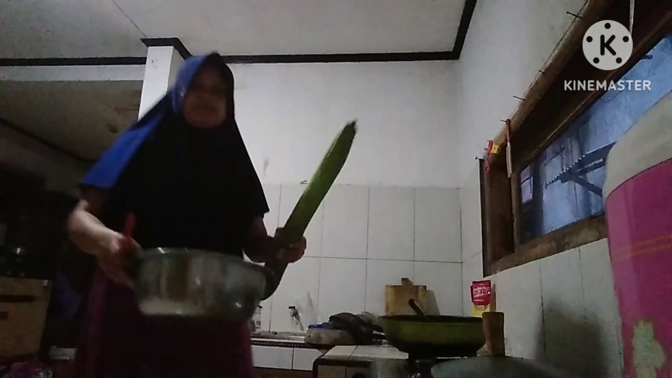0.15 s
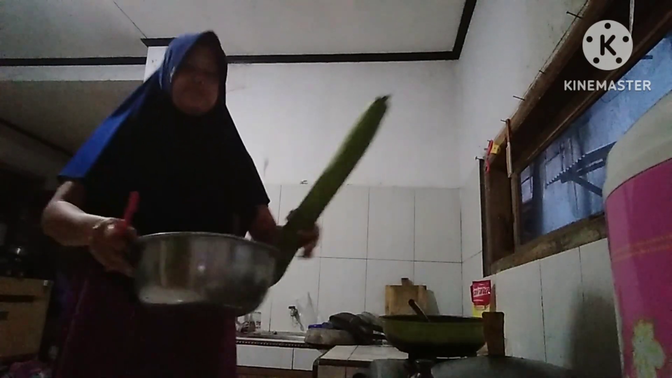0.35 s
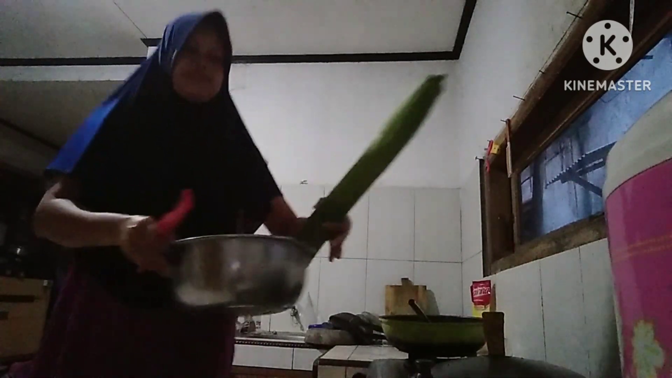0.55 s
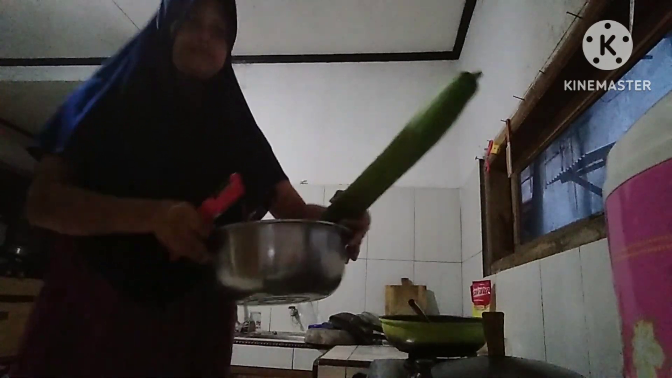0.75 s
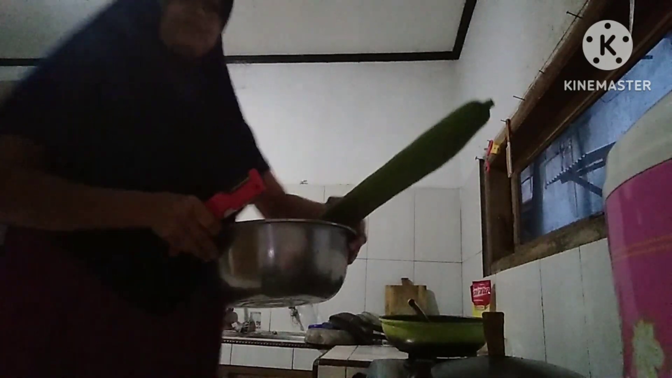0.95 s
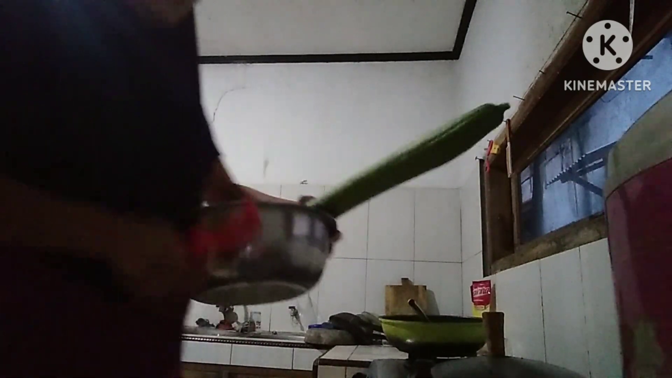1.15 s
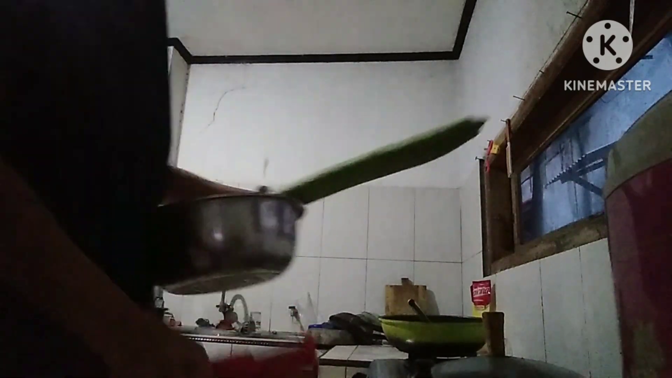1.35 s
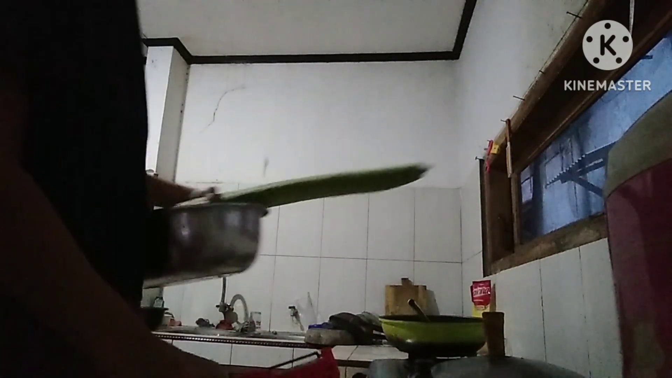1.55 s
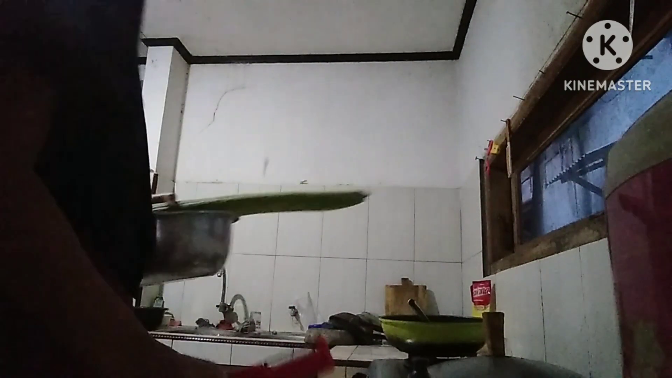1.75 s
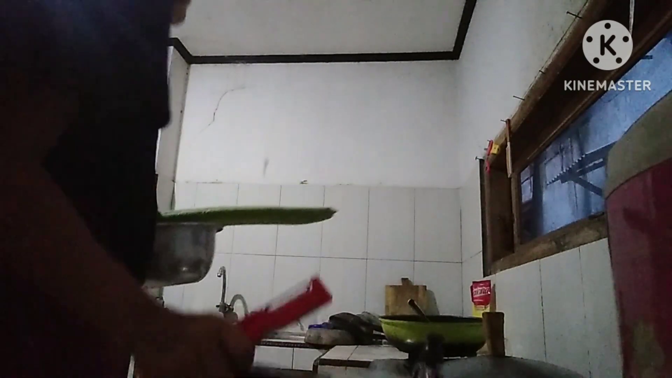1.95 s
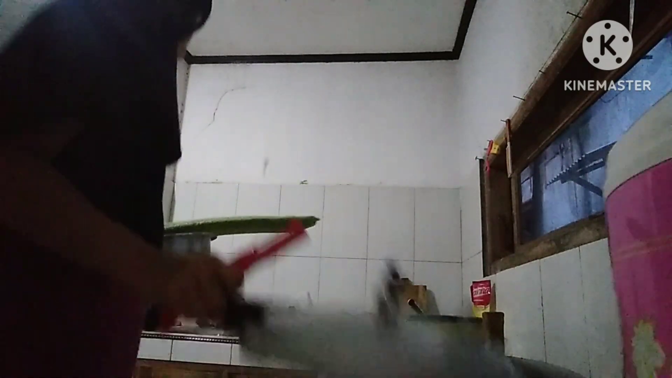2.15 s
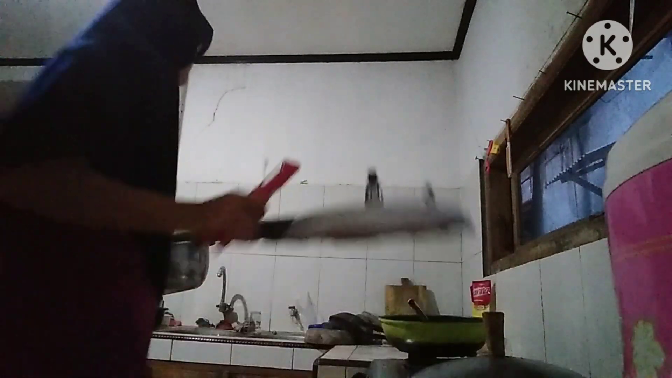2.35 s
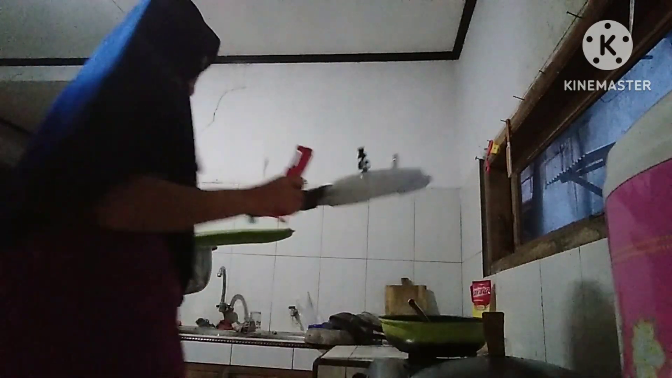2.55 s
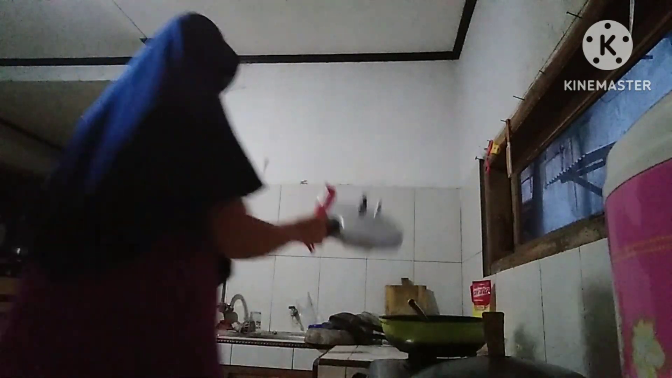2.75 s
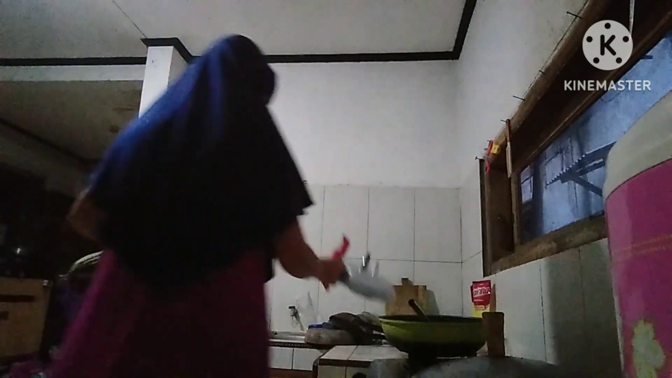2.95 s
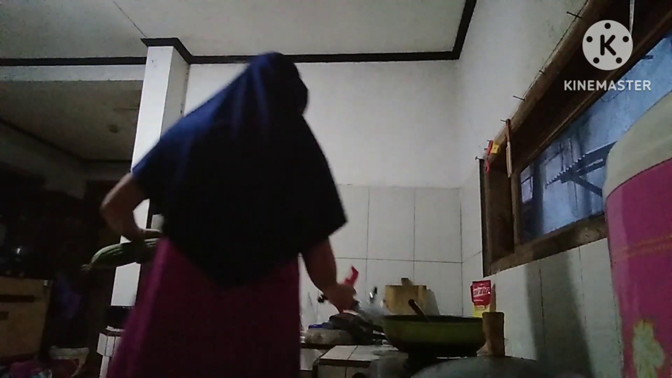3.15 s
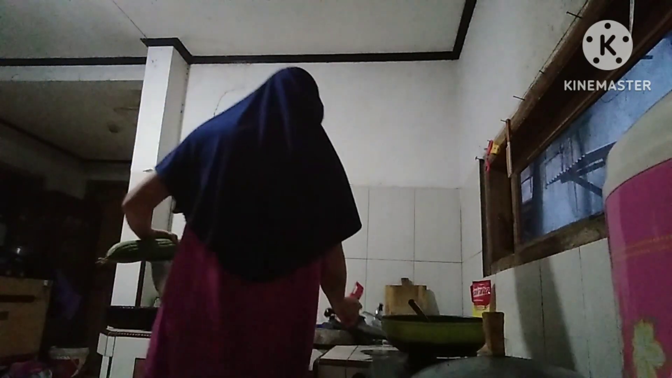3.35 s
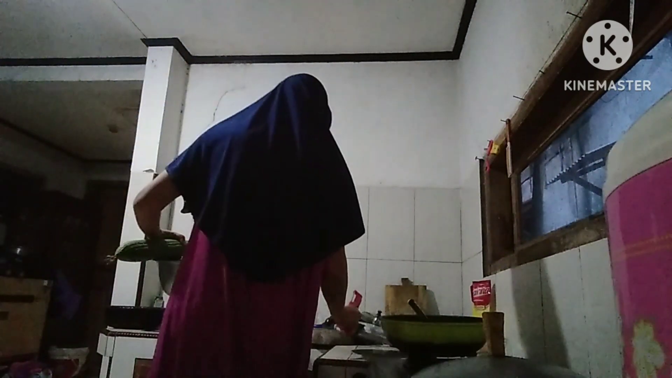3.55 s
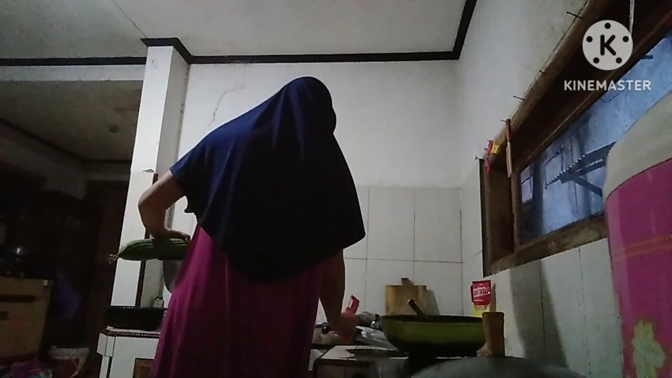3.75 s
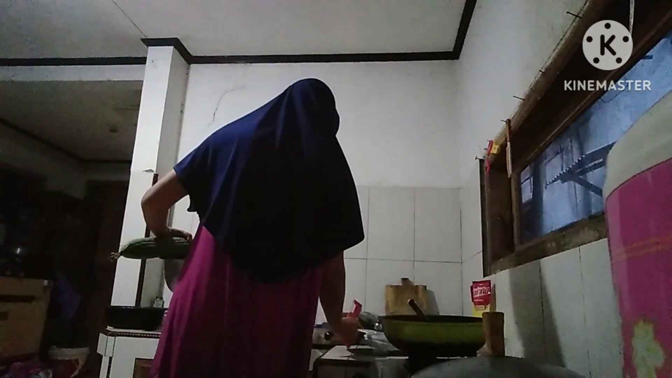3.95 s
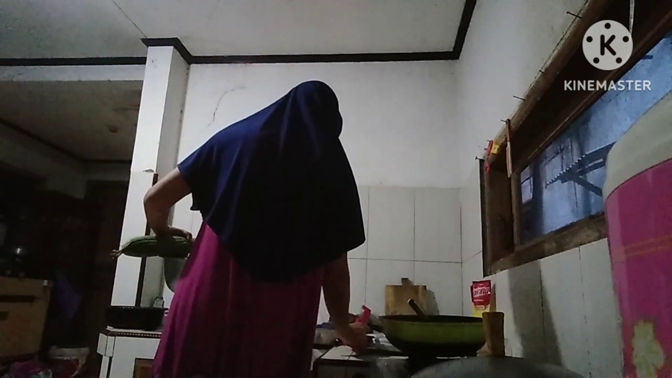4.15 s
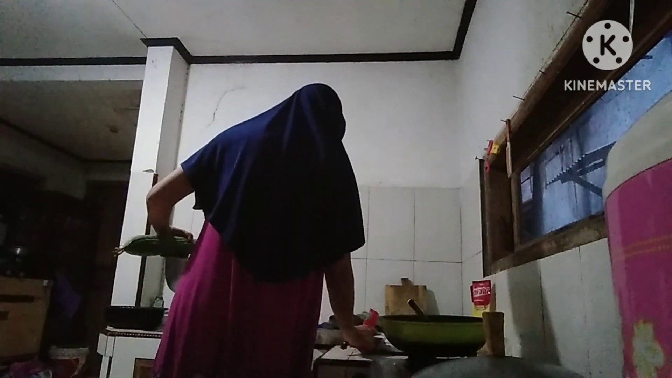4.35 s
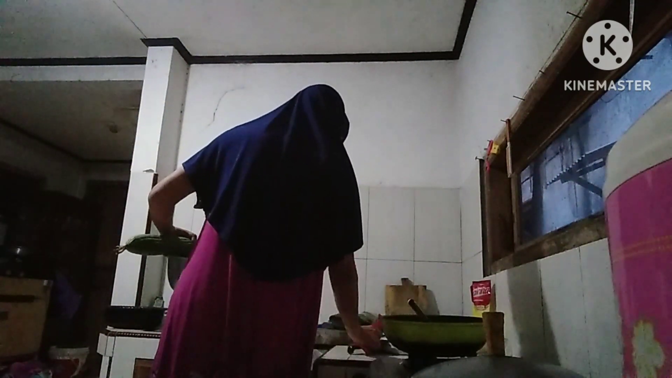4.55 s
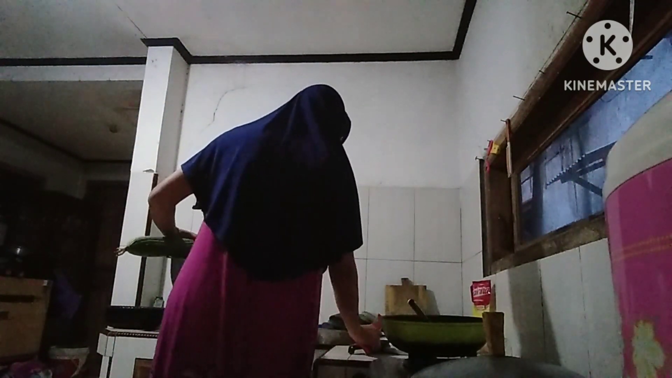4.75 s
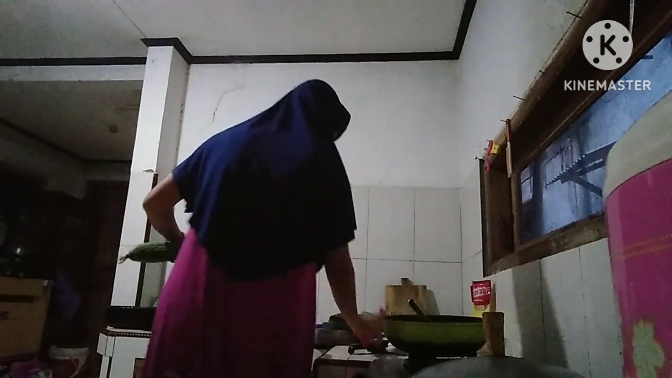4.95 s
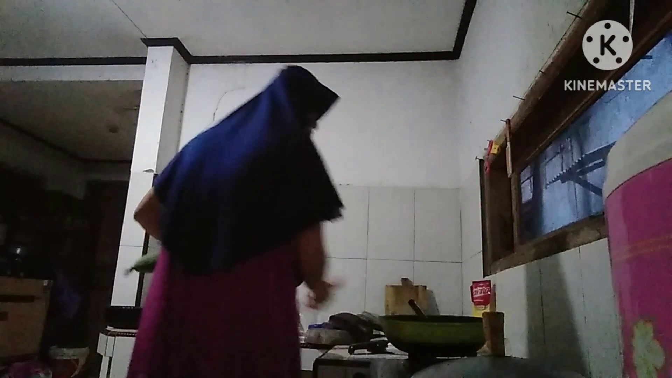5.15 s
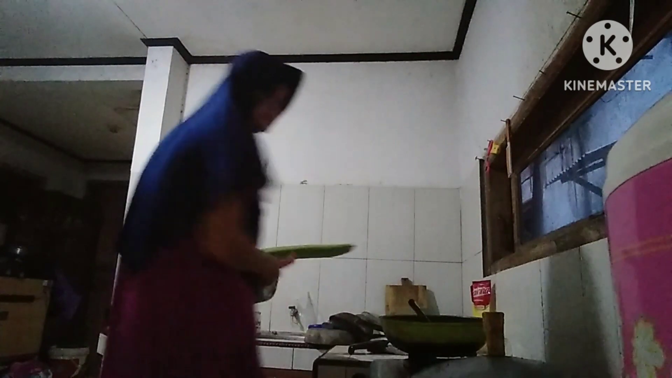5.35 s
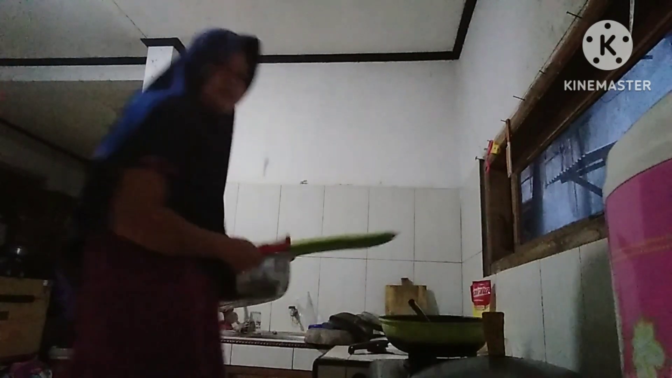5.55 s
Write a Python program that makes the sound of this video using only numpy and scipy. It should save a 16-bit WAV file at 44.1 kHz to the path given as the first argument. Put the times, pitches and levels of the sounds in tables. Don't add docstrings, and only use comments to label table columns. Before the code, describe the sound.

A cook shuffles with rustling cloth, a steel bowl knocks sharply, and farther off a lid bangs down, slides and clatters against pots.

```python
import sys
import numpy as np
from scipy import signal
from scipy.fft import rfft, irfft, next_fast_len
from scipy.io import wavfile
from scipy.ndimage import uniform_filter1d

SR = 44100
rng = np.random.default_rng(int(sys.argv[2]) if len(sys.argv) > 2 else 0)


def store_wav(level_fs):
    pcm = np.round(np.clip(np.atleast_2d(level_fs), -1, 1) * 32767)
    wavfile.write(sys.argv[1], SR, pcm.T.astype(np.int16))


def makeup_ratio(level_db):
    decades = np.asarray(level_db, float) / 20
    return 10 ** decades


N = 246519

# [peak t/s, swell time/s, cloth level/dB, hiss level re cloth/dB]
SCUFFS = [(0.0, .01, -69.5, -3), (0.1, 0.13, -69, -1), (0.4, 0.0067, -70, 13.5), (0.45, 0.026, -67, -1),
          (0.6, 0.15, -65, -3.5), (0.76, 0.2, -71, 7.5), (0.9, 0.09, -71, 3), (1.04, 0.063, -69, 3),
          (1.2, 0.085, -81, 4), (1.36, 0.45, -72.5, 0), (1.5, 0.13, -69.5, 0.5), (1.72, 0.16, -77, 4.5),
          (1.8, 0.022, -70, 2.5), (1.88, .06, -71.5, 3), (2.27, 0.068, -68, 2), (2.4, 0.041, -73.5, -1),
          (2.83, 0.048, -78.5, 7), (2.96, 0.23, -69, -3.5), (3.2, 0.083, -82, 3.5), (3.45, 0.13, -77, 1.5),
          (3.53, 0.13, -75.5, 1.5), (5.099, .1, -85, 3.5), (5.26, 0.092, -72.5, 1.5),
          (5.391, 0.0076, -72.5, 5), (5.489, 0.082, -63.5, 2.5), (5.58, 0.04, -83, -5.5)]
# [f/Hz, level per Hz/dB]
CLOTH_SPECTRUM = [(200, -3), (500, 0.5), (1200, 0), (2500, -1), (4000, -7), (5500, -16)]
HISS_SPECTRUM = [(3000, -18), (5000, 1.5), (6500, 11.5), (9000, -12), (15500, 1)]

# [t/s,
# level/dB, f/Hz, t60/s]
NUDGES = [(0.02, -69, 880, 1.2), (0.78, -55, 213, .8), (1.975, -47, 664, .6), (1.8, -68, 4350, .15),
          (1.795, -71, 5500, .3), (1.82, -70, 3850, .15), (1.875, -67, 5450, .2), (1.16, -66, 1150, .4),
          (0.888, -58, 1600, .15), (1.788, -57, 395, 0.27), (1.834, -51, 396, 0.22), (1.84, -60, 470, .15),
          (2.72, -57, 645, .2), (2.73, -61, 590, .15), (2.94, -57, 655, .3), (2.955, -58, 615, .25),
          (3.295, -70, 1740, .45), (.398, -57, 2500, .06), (.396, -54, 6500, .04), (.442, -52, 3100, .04),
          (.442, -51, 3600, .03), (.42, -58, 4800, .06), (.438, -58, 5000, .05), (.562, -52, 3400, .05),
          (.575, -62, 1300, .1), (.592, -62, 1750, .06), (1.9, -60, 250, .25), (.04, -69, 1000, .2),
          (1.025, -65, 3150, .05), (1.025, -65, 4400, .1),
          (3.8, -56, 228, .8), (4.0, -58, 482, .5), (4.16, -57, 226, .5), (4.72, -60, 228, .5),
           (3.905, -37, 2001, .2), (3.96, -47, 1702, .35), (4.06, -45, 520, .35), (4.105, -50, 2422, .3),
           (4.17, -57, 2014, .5), (4.195, -50, 2430, .4), (4.2, -55, 1071, .45), (4.25, -51, 634, .35),
           (4.27, -52, 2430, .3), (4.32, -57, 2500, .25), (4.35, -59, 1815, .3), (4.34, -55, 1250, .5),
           (4.38, -56, 1200, .4), (4.44, -52, 1225, .5), (4.2, -55, 630, .5), (3.66, -60, 4960, .3),
           (3.68, -57, 2060, .3), (3.69, -55, 2425, .4), (3.575, -58, 5700, .12), (3.59, -60, 5330, .25),
           (4.57, -47, 1500, .3), (4.6, -49, 1525, .5), (4.71, -51, 1590, .3), (4.78, -54, 1555, .14),
           (4.51, -49, 2425, .3), (4.51, -50, 1550, .3), (4.71, -50, 1250, .3), (4.71, -60, 4550, .15),
           (4.71, -54, 2620, .15), (4.71, -55, 2300, .2), (4.5, -60, 6580, .6), (4.71, -56, 405, .8),
           (4.15, -67, 6550, .8), (3.7, -67, 3600, .5), (5.13, -76, 5480, .9), (5.2, -78, 5500, .6)]

# [t/s, peak level/dB, extra bass level/dB, extra treble level/dB, contact time/s]
STEP_HITS = [
    (0.395, -54.5, -18, -9, 0.0029),
    (0.444, -50.5, -18, -7, 0.0017),
    (0.566, -53, 0, -21, 0.0018),
    (1.026, -53, -10, 23, 0.00087),
    (2.958, -71, 5, 1, 0.0009),
    (5.385, -67, -2, 3, 0.0015),
    (5.474, -68.5, 6, -18, 0.0021),
]
BASIN_HITS = [
    (.774, -42, 2.5, -4, 0.0034),
    (.796, -47, 11, -24, 0.0014),
    (.891, -44.5, -12, -15, 0.0014),
    (1.158, -54, 4, -9, 0.0024),
    (1.204, -63, 16, 10, 0.0031),
    (1.779, -56.5, -6, -20, 0.0033),
]
BOWL_HITS = [
    (1.905, -31.5, 0.5, 1.5, 0.002),
    (1.962, -50, -14, 30, 0.0028),
    (1.9685, -22, -1, 4, .001),
    (1.976, -23.5, 6.5, -22, 0.0014),
]
RIM_HITS = [
    (3.554, -38.5, -0.5, 2.5, 0.0054),
    (3.565, -41, -5.5, -5, .004),
]
LID_HITS = [
    (3.77, -18.5, -9, -2, 0.0021),
    (3.775, -13.5, -2.5, 2, 0.0031),
    (3.786, -15.5, -11.5, 3.5, 0.0049),
    (3.795, -36, 3, 3, 0.0033),
    (3.822, -25.5, -8, 2.5, 0.0034),
    (3.992, -35, 1.5, -6, 0.0051),
]
POT_HITS = [
    (4.507, -35, -6.5, -11.5, 0.004),
    (4.565, -29.5, 0, 3.5, 0.0021),
    (4.588, -35.5, 5, -12, 0.0045),
    (4.712, -40.5, -1.5, -6.5, .004),
    (4.83, -56, 0, -2, 0.0034),
]

# [f/Hz, level/dB, t60/s]
BASIN_MODES = [(218, -12.5, 0.28), (960, -17.5, .1), (1100, -13, .2), (1183, 0, 0.48), (1360, -16, 0.22)]
BOWL_MODES = [(488, -11, .8), (520, 4, .08), (545, -20, .6), (662, -15, .4), (1087, -19, .8),
              (1174, -16, .4), (1256, -11, .4), (1276, -15, .5), (1625, -10, .5), (1771, -8, .35),
              (1812, -8, .5), (1842, -18, .8), (1941, -16, .4), (1988, -17, .8), (2078, -16, .9),
              (2215, -14, .45), (2299, -14, .7), (2450, -20, .9), (2514, -6, .5), (2616, -12, .3),
              (2910, -16, .4), (3300, -22, .45), (3644, -22, .4), (3730, 14, 0.04), (3900, 10, .04),
              (4210, 4, 0.04), (4565, -14, .15), (5900, -22, .3), (6080, -18, 0.3), (6492, -22, 0.4)]
RIM_MODES = [(610, -5, .7), (950, -8, .2), (1150, -8, .15), (1357, -8, .25), (1500, -6, .15),
             (1707, -16, .4), (2020, -7, .15), (2215, -14, .4), (2695, -17, .6), (3085, -22, .5),
             (3951, -19, .3), (5030, -18, .3), (5356, -15, .45), (5680, -10, .25), (6455, -17, .2)]
LID_MODES = [(484, -11, .7), (527, -10, .6), (550, -13, .5), (611, -7, .45), (643, -7, .45), (674, -8, .25),
             (895, -11, .45), (1050, -10, .3), (1141, -12, .5), (1158, -12, .4), (1200, -13, .6),
             (1361, -5.5, .4), (1445, -11, .4), (1522, -14, .4), (1592, -14, .45), (1690, -8, .42),
             (1766, -15, .5), (1913, -8, .35), (1965, -5, .15), (2000, -3, .25), (2020, -15, .5),
             (2054, -13, .4), (2188, -10, .3), (2210, -6, .35), (2305, -10, .36), (2422, -5, .38),
             (2612, -11, .3), (2824, -19, .4), (3052, -15, .2), (3478, -19, .2), (4657, -22, .2),
             (5340, -25, .28), (6002, -27, .3), (6374, -24, .4), (6600, -25, .35)]
POT_MODES = [(340, -19, .6), (430, -8, 1.3), (485, -10, .6), (636, -9, .9), (715, -12, .7), (850, -12, .7),
             (1205, -6, .7), (1340, -6, .3), (1450, -7, .4), (1555, -5, .5), (1645, -6, .4),
             (1795, -10, .4), (1870, -13, .3), (2010, -16, .5), (2315, -15, .4), (2430, -5, .4),
             (2554, -11, .4), (2740, -12, .4), (3000, -13, .3), (4540, -26, 0.36), (5663, -30, 0.36),
             (6580, -22, 0.5)]

# [f/Hz, level per Hz/dB]
STEP_TONE = [(60, -18), (600, -31), (1500, -7.5), (3000, -3), (5000, -1.5), (9000, -8), (16000, -13)]
BASIN_TONE = [(24, -29), (40, 4), (220, -2.5), (852, -2.5), (1070, 5), (1520, -4), (5050, -18.5),
              (6330, -0.5), (14800, -32), (16000, -13)]
BOWL_TONE = [(60, -35.5), (340, -22.5), (500, -6), (600, -13), (680, -7.5), (770, -20), (1250, -4),
             (1470, -14), (1800, -5.5), (2700, -7.5), (3450, -12.5), (4000, -10.5), (5300, -19.5),
             (6400, -13), (10000, -33), (16000, -32)]
RIM_TONE = [(35, -54.5), (60, -34.5), (287, -9.5), (417, -11.5), (607, 1), (822, -9), (3420, -27.5),
            (5590, -27.5), (16000, -43)]
LID_TONE = [(50, -31.5), (400, -12), (480, -1.5), (640, 4), (780, -4.5), (950, -15), (1300, -4),
            (1520, -6.5), (2000, -6), (2400, -10), (3250, -20), (5000, -25.5), (6500, -23.5), (9000, -39.5),
            (13000, -42), (15300, -40)]
POT_TONE = [(60, -25.5), (310, -8), (430, 0.5), (950, -12.5), (1550, -6), (2000, -10), (2450, -8.5),
            (4100, -18), (6600, -18), (10000, -28.5), (13000, -34.5), (15300, -28.5)]

# [t/s, metal level/dB, grit level/dB]
SLIDE_PRESSURE = [(3.555, -59.5, -68), (3.63, -56.5, -63), (3.68, -53, -62), (3.76, -59.5, -63),
                  (3.95, -47, -68), (4.08, -52, -65), (4.14, -53.5, -62.5), (4.18, -51.5, -60),
                  (4.31, -57.5, -61), (4.44, -63.5, -64), (4.55, -51.5, -61.5), (4.6, -48, -66),
                  (4.7, -54, -73.5), (4.75, -55, -81.5), (4.86, -81.5, -89)]
# [f/Hz, level per Hz/dB]
GRIT_SPECTRUM = [(2500, -24.5), (4000, 11), (5200, 13.5), (7000, 10.5), (10000, 4), (13000, 2.5),
                 (15300, 2.5)]
# [f/Hz, width/Hz, level/dB]
RIM_SHIMMER = [(3950, 51, 2), (5123, 95, 4.5), (5600, 130, 3), (6500, 300, 5)]
# [f/Hz, width/Hz, level/dB]
SLIDE_EARLY = [(600, 150, -5), (1350, 35, -3), (1720, 35, -4), (2060, 50, -1), (2220, 40, -5),
               (2425, 35, -3), (2700, 40, -4), (3630, 60, -12), (3935, 50, -7), (4480, 35, -7),
               (4960, 60, -4), (5360, 40, -8), (5710, 50, -6), (6460, 120, -6), (7980, 40, -12)]
SLIDE_LATE = [(228, 20, -10.5), (450, 67, -7), (555, 80, 0), (630, 44, -2), (745, 60, -7), (860, 70, -9),
              (1030, 40, 0), (1250, 60, -4), (1390, 50, -3), (1580, 40, -2), (1800, 30, -1), (2020, 70, -4),
              (2350, 40, -7), (2430, 30, -3), (5150, 70, -16), (5750, 61, -14), (6580, 40, -12)]
SLIDE_POTS = [(433, 109, 1), (1264, 180, 2.5), (1600, 54, 5), (2050, 25, -29), (2350, 190, -13.5),
              (2770, 140, -13), (4640, 220, -14), (5160, 55, -28), (5700, 150, -23)]
BANG_S, CLATTER_S = 3.77, 4.507

# [f/Hz, t60/s]
KITCHEN_DECAY = [(150, 0.8), (600, 0.58), (2000, 0.67), (5000, 0.47), (12000, 0.37)]
# [f/Hz, level per Hz/dB]
AIR_SPECTRUM = [(7.1, -22.5), (12, 5.5), (71, -12), (137, -7), (175, -10), (216, -13.5), (371, -17),
                (445, -13), (502, -17.5), (1580, -23), (1830, -27), (14200, -32), (16000, -25.5)]
# [f/Hz, width/Hz, level/dB]
PORT_RESONANCES = [(6720, 310, 2.5), (15200, 2500, 5)]


def unit(x):
    return x / np.sqrt(np.mean(x ** 2) + 1e-20)


def along(points, hz):
    f, value = np.transpose(points)
    return np.interp(np.log(hz + 1), np.log(f + 1), value)


def curves(rows):
    s, *columns = np.transpose(rows)
    t = np.arange(N) / SR
    return [np.interp(t, s, c, left=-120, right=-120) for c in columns]


def filtered(x, response):
    m = next_fast_len(len(x) + 8192)
    return irfft(rfft(x, m) * response(np.fft.rfftfreq(m, 1 / SR)), m)[:len(x)]


def resonance(f, centre, width):
    return 1j * f * width / (centre * centre - f * f + 1j * f * width)


def causal(x, spectrum):
    level_db = np.maximum(along(spectrum, np.fft.rfftfreq(4096, 1 / SR)), -120)
    cepstrum = irfft(np.log(makeup_ratio(level_db)))
    cepstrum = cepstrum * np.r_[1, np.full(2047, 2), 1, np.zeros(2047)]
    return signal.fftconvolve(x, irfft(np.exp(rfft(cepstrum))))[:len(x)]


def rush(spectrum, patchy_db):
    z = signal.stft(rng.standard_normal(N), nperseg=512)[2]
    field = uniform_filter1d(rng.standard_normal(z.shape), size=6, axis=0)
    field = uniform_filter1d(field, size=10, axis=1)
    noise = signal.istft(z * makeup_ratio(patchy_db * unit(field)), nperseg=512)[1][:N]
    return unit(filtered(noise, lambda hz: makeup_ratio(along(spectrum, hz))))


def room(x, wet_db):
    hz, t, z = signal.stft(rng.standard_normal(SR), SR, nperseg=256)
    decay = makeup_ratio(-60 * t / along(KITCHEN_DECAY, hz)[:, None])
    tail = signal.istft(z * decay, SR, nperseg=256)[1][:SR]
    tail = tail * np.clip(np.arange(SR) / SR / 0.00081, 0, 1)
    return makeup_ratio(wet_db) * signal.fftconvolve(x, tail / np.linalg.norm(tail))[:len(x)]


def kitchen(x, wet_db):
    return x + room(x, wet_db)


def struck(hits, tone, modes, ring_db, damping, wet_db):
    out = np.zeros(N + 2 * SR)
    t = np.arange(SR * 6 // 5) / SR
    u = t[:SR * 3 // 5]
    hz, mode_db, t60 = np.reshape(np.transpose(modes), (3, -1, 1))
    phase = 2 * np.pi * rng.random(hz.shape)
    for s, db, low_db, top_db, length in hits:
        touch = [(500, low_db), (1200, 0), (2500, 0), (4500, top_db)]
        colour = [(f, level + along(touch, f)) for f, level in tone]
        length = max(length, 0.0005)

        grit = rng.standard_normal(len(t)) * t / length * np.exp(1 - t / length)
        size = np.linalg.norm(grit) * makeup_ratio(-7)
        burst = causal(grit, colour)
        impulse = 1.0 * (t == t[round(length * SR)])
        blow = causal(impulse, colour)

        uneven_db = 1.5 * rng.standard_normal(hz.shape)
        strength = makeup_ratio(ring_db + mode_db + along(touch, hz) + uneven_db)
        decay = makeup_ratio(-60 * u / (damping * np.minimum(t60, 0.8)))
        ring = strength * decay * np.sin(2 * np.pi * hz * (u + s) + phase)
        ring = ring.sum(axis=0) * (1 - np.exp(-u / 0.0019))
        ring = np.pad(ring, (0, len(t) - len(u)))

        far = room(size * blow / np.linalg.norm(blow) + 0.24 * ring, wet_db)
        near = size * burst / np.linalg.norm(burst) + ring
        out[round(s * SR):][:len(t)] += makeup_ratio(db) * (near + far)
    return out[:N]


def rustle():
    s, swell, cloth_db, hiss_db = np.transpose(SCUFFS)[:, :, None]
    block = 64
    late = np.arange(0, N + block, block) / SR - s
    rise_db = 13 * np.minimum(late, 0) / swell

    def level(peak_db, fade_db_per_s):
        each = makeup_ratio(peak_db + rise_db - fade_db_per_s * np.maximum(late, 0))
        return np.repeat(np.linalg.norm(each, axis=0), block)[:N]

    cloth = level(cloth_db, 63) * rush(CLOTH_SPECTRUM, patchy_db=0.7)
    hiss = level(cloth_db + hiss_db, 111) * rush(HISS_SPECTRUM, patchy_db=0.8)
    return cloth + hiss


def nudges():
    out = np.zeros(N + SR)
    u = np.arange(SR) / SR
    waver = uniform_filter1d(rng.standard_normal((2, N + SR)), size=500)
    waver = unit(uniform_filter1d(waver, size=500))
    for s, db, hz, t60 in NUDGES:
        i = round(s * SR)
        rise = 1 - np.exp(-u / min(0.011, t60 / 20))
        phase = (0.4 + hz / 5000) * waver[0, i:i + SR]
        out[i:i + SR] += makeup_ratio(db - 60 * u / t60) * rise * np.sin(2 * np.pi * hz * u + phase)
    return kitchen(out * makeup_ratio(1.5 * waver[1]), wet_db=-7)[:N]


def footsteps():
    return struck(STEP_HITS, STEP_TONE, [], ring_db=0, damping=1, wet_db=5.5)


def basin():
    return struck(BASIN_HITS, BASIN_TONE, BASIN_MODES, ring_db=-17, damping=0.4, wet_db=1.5)


def bowl():
    return struck(BOWL_HITS, BOWL_TONE, BOWL_MODES, ring_db=-17, damping=0.44, wet_db=-2)


def rim():
    return struck(RIM_HITS, RIM_TONE, RIM_MODES, ring_db=-12, damping=0.83, wet_db=2.5)


def slide():
    metal_db, grit_db = curves(SLIDE_PRESSURE)
    roughness = unit(uniform_filter1d(rng.standard_normal(N), size=200))
    grains = rng.standard_normal(N) * makeup_ratio(2 * roughness)

    def body(peaks):
        def response(f):
            return sum((-1) ** k * makeup_ratio(db) * resonance(f, c, w) for k, (c, w, db) in enumerate(peaks))
        return unit(filtered(grains, response))

    def shimmer(f):
        return 1 + sum(makeup_ratio(db) * w * w / (w * w + 4 * (f - c) ** 2) for c, w, db in RIM_SHIMMER)

    stage = np.searchsorted([BANG_S, CLATTER_S], np.arange(N) / SR)
    metal = np.choose(stage, [body(p) for p in (SLIDE_EARLY, SLIDE_LATE, SLIDE_POTS)])
    metal = metal + makeup_ratio(-4.5) * rush(POT_TONE, patchy_db=2)
    grit = unit(filtered(rush(GRIT_SPECTRUM, patchy_db=2.2), shimmer))
    return kitchen(makeup_ratio(metal_db) * metal + makeup_ratio(grit_db) * grit, wet_db=-5.5)


def lid():
    return struck(LID_HITS, LID_TONE, LID_MODES, ring_db=-16.5, damping=0.85, wet_db=-1.5)


def pots():
    return struck(POT_HITS, POT_TONE, POT_MODES, ring_db=-11, damping=0.44, wet_db=4.5)


def scene():
    hand = rustle() + nudges() + footsteps()
    metal = basin() + bowl() + rim() + slide() + lid() + pots()
    return (hand + metal)[None]


def low_pass(x):
    return signal.sosfilt(signal.butter(12, 15640, fs=SR, output="sos"), x)


def record(dry):
    def port(f):
        return 1 + sum((makeup_ratio(db) - 1) * resonance(f, c, w) for c, w, db in PORT_RESONANCES)

    air = makeup_ratio(-66.5) * rush(AIR_SPECTRUM, patchy_db=-2.4)
    heard = filtered(dry[0], port) + air
    return low_pass(heard[None])


dry = scene()
out = record(dry)
store_wav(out)
```